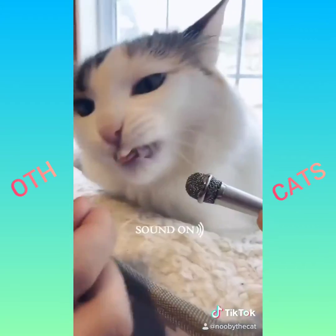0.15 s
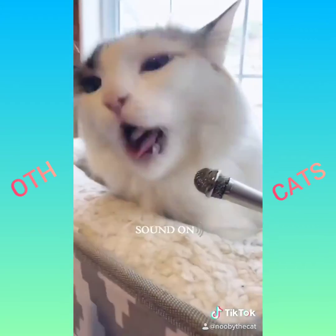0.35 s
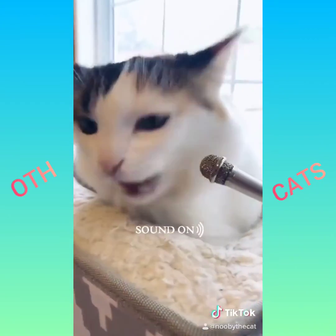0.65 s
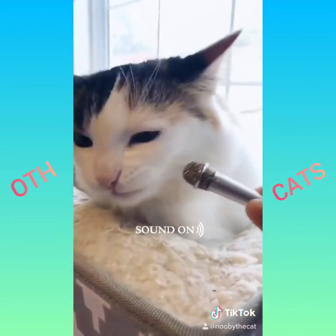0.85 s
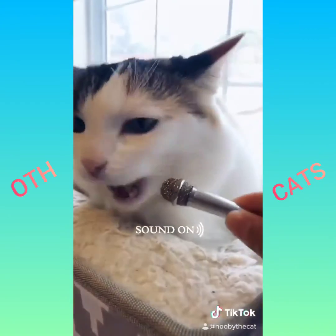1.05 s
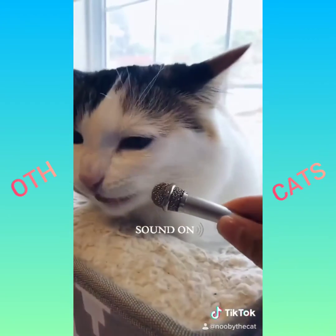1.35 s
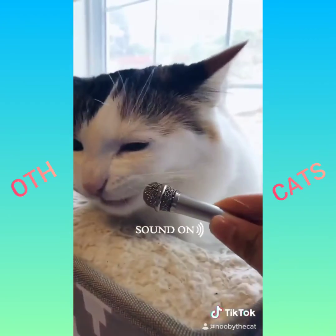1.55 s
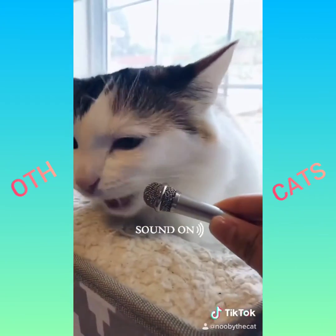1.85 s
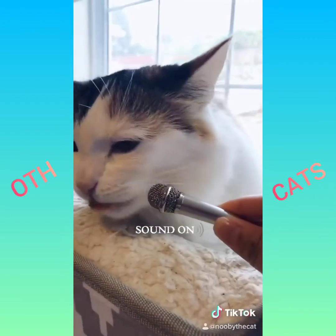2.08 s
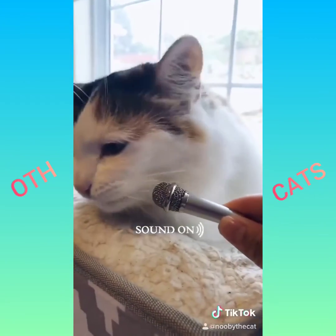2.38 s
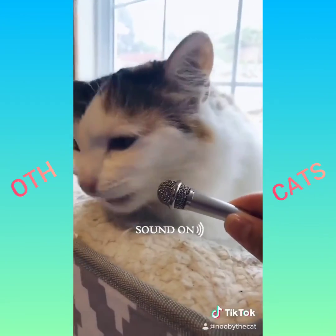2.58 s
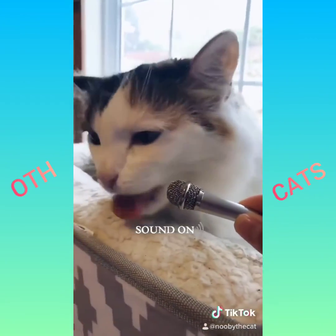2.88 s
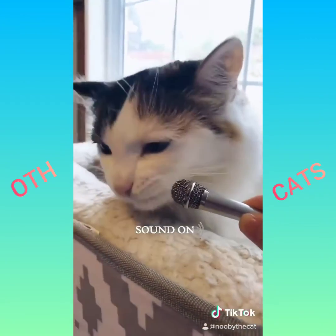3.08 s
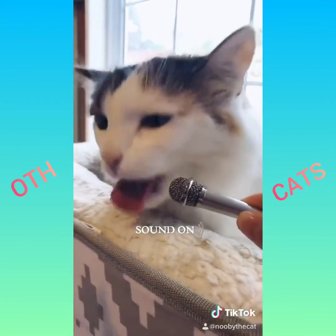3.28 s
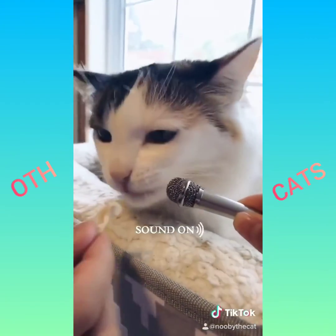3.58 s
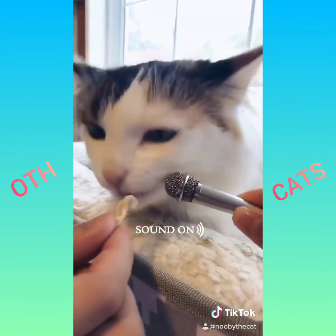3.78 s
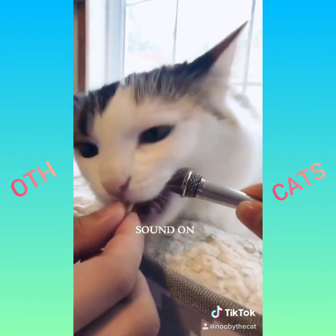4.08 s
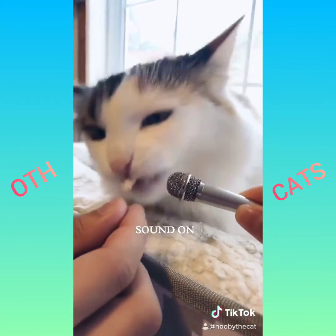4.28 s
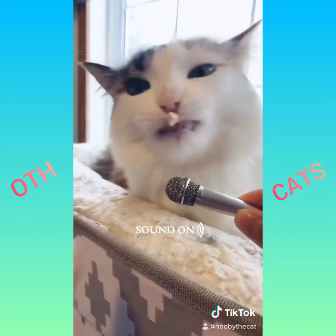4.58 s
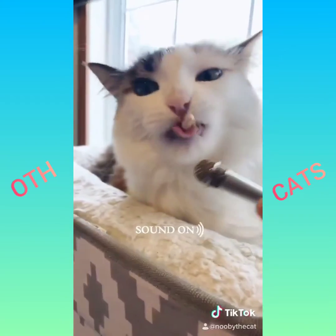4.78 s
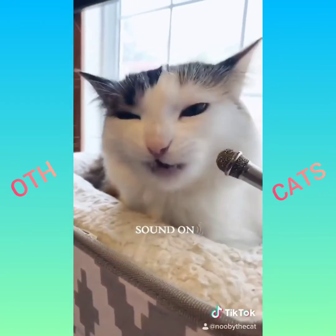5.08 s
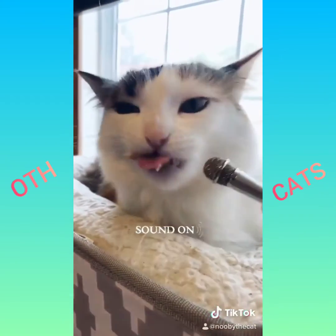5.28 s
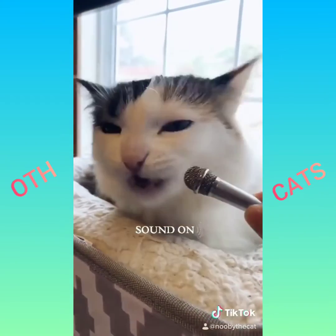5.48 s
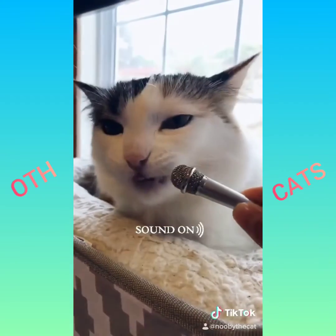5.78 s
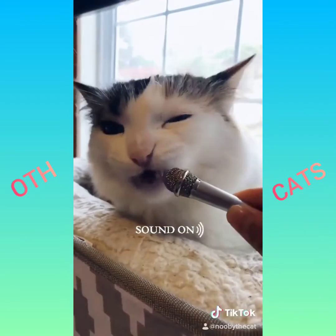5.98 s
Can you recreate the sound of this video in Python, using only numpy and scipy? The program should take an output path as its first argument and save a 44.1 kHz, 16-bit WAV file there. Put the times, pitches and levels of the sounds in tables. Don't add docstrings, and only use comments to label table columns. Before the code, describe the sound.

Extreme close-up of a cat chewing crunchy treats: brittle snaps, moist smacking and grinding, a quiet pause, then much harder bites.

```python
import sys
import numpy as np
from scipy import signal
from scipy.fft import rfft, irfft, next_fast_len
from scipy.io import wavfile
from scipy.ndimage import uniform_filter1d

SR = 44100
rng = np.random.default_rng(int(sys.argv[2]) if len(sys.argv) > 2 else 0)


def natural_amplitude(level_db):
    exponent = np.asarray(level_db, float) / 20
    return 10 ** exponent


def dump(signal):
    limited = np.clip(np.atleast_2d(signal).T, -1, 1)
    pcm = np.round(limited * 32767).astype(np.int16)
    wavfile.write(sys.argv[1], SR, pcm)


N = 270774
T = np.arange(N) / SR
GLIDE = 0.07

# start_s, length_s, crush_db, fizz_over_crush_db
CHEWS = [(.454,0.049,-58.5,-25),(.614,0.037,-55.5,-13),(.658,0.1,-58,-9.5),(1.067,0.067,-46,-9),(1.136,0.039,-46,-13),(1.172,0.018,-54.5,-13),(1.254,0.025,-54.5,-20),(1.321,0.06,-59,-0.5),(1.414,0.044,-49.5,-3.5),(1.458,0.05,-51.5,-6),(1.512,0.077,-56.5,-14),(1.632,0.063,-56.5,-14),(1.714,0.047,-49,-6),(1.818,0.087,-54.5,-7.5),(2.348,0.047,-68,-6),(3.907,0.02,-54,-11),(3.928,0.14,-58,-14),(4.083,0.065,-47.5,-8.5),(4.148,0.07,-61.5,-8),(4.516,0.02,-55.5,-11),(4.708,0.036,-64,2.5),(4.79,0.036,-55,-21),(4.849,0.026,-52,-7),(4.94,0.1,-59,-8),(5.447,0.026,-51.5,-10),(5.553,0.037,-64,-2),(5.784,0.029,-58.5,-6),(5.871,0.085,-46.5,-0.5),(5.953,0.046,-49,-7),(6.118,0.026,-51,-5)]
# start_s, length_s, crush_db
BITES = [
    (4.816,0.014,-58),
    (4.831,0.0081,-47),
    (5.062,0.014,-49),
    (5.351,0.025,-49.5),
    (5.384,0.009,-36),
    (5.393,0.016,-43),
    (5.485,0.018,-48),
    (5.535,0.0098,-44.5),
    (6.006,0.017,-51),
    (6.092,0.022,-48.5),
]
# start_s, length_s, crush_db
GRINDS = [(0.099,0.068,-63.5),(0.595,0.032,-65),(0.85,0.091,-64.5),(0.997,0.048,-67),(1.279,0.047,-65.5),(1.365,0.042,-58.5),(1.679,0.033,-61.5),(1.758,0.068,-63.5),(1.907,0.13,-65.5),(2.138,0.063,-70),(2.681,0.12,-66),(3.104,0.091,-69.5),(3.207,0.028,-60.5),(3.586,0.18,-70.5),(3.747,0.12,-64.5),(3.871,0.035,-64),(4.388,0.032,-62.5),(4.418,0.12,-74),(4.546,0.21,-71),(4.633,0.066,-61.5),(5.08,0.074,-73),(5.154,0.07,-61),(5.22,0.024,-69),(5.315,0.053,-63),(5.42,0.03,-73),(5.503,0.037,-60),(5.599,0.045,-64),(5.635,0.069,-62),(5.818,0.049,-63),(6.02,0.049,-64)]
STROKES = CHEWS + [(*row, -9) for row in BITES] + [(*row, -7) for row in GRINDS]
CRUSH_DB, FIZZ_DB = np.transpose(STROKES)[2:]


def evened(x):
    return x / np.sqrt(np.mean(x ** 2) + 1e-20)


def colour(x, points):
    size = next_fast_len(len(x))
    f, db = np.transpose(points)
    hz = np.fft.rfftfreq(size, 1 / SR)
    gain = natural_amplitude(np.interp(np.log(hz + 1), np.log(f + 1), db))
    return irfft(rfft(x, size) * gain, size)[:len(x)]


def add(mix, s, sound):
    part = mix[round(s * SR):][:len(sound)]
    part += sound[:len(part)]


def resonate(x, hz, width):
    turn = np.exp(2j * np.pi * np.cumsum(hz * np.ones(len(x))) / SR)
    r = np.exp(-np.pi * width / SR)
    smooth = signal.lfilter([1 - r], [1, -r], x / turn + 1e-18)
    return 2 * (turn * smooth).real


def surges(rows, rest_db, rise_db_s, fall_db_s):
    s, db = np.transpose(rows)[:, :, None]
    below_peak = np.maximum(rise_db_s * (s - T), fall_db_s * (T - s))
    return np.maximum((db - below_peak).max(axis=0), rest_db)


def pressure(rows, db, sag_db=0):
    gain = np.zeros(N)
    for (s, length, *_), level_db in zip(rows, db):
        add(gain, s, natural_amplitude(level_db + sag_db * np.linspace(.5, -.5, round(length * SR))))
    fade = np.exp(-1 / (0.011 * SR))
    settling = natural_amplitude(-9) * signal.lfilter([1 - fade], [1, -fade], gain)
    gain = np.maximum(gain, settling)
    return abs(uniform_filter1d(uniform_filter1d(gain, size=150), size=150))


def crumbs(per_s, spread_db, length_s, bed):
    size = natural_amplitude(np.clip(spread_db, 0, 5) * np.minimum(rng.exponential(1, N), 3))
    breaks = size * (rng.random(N) < per_s / SR)
    fade = np.exp(-1 / (length_s * SR))
    puffs = evened(signal.lfilter([1], np.convolve([1, -fade], [1, -fade]), breaks))
    return evened((puffs + bed) * rng.standard_normal(N))


def pockets(x, depth_db):
    hz, t, z = signal.stft(x, SR, nperseg=256)
    patches = rng.standard_normal((len(t), len(hz))).T
    patches = evened(uniform_filter1d(uniform_filter1d(patches, size=4, axis=0), size=9, axis=1))
    return signal.istft(z * natural_amplitude(depth_db * patches), SR, nperseg=256)[1][:N]


def room():
    # pitch_hz, level_db per Hz
    air_colour = [(47, -4.5), (80, -2.5), (129, -1.5), (185, -6), (1180, -19.5), (1600, -26.5),
                  (1710, -23.5), (9170, -40), (12700, -46), (13800, -74)]
    # pitch_hz, width_hz, level_db
    hum_lines = [(122.6, 8, -58.5)]
    air = natural_amplitude(-57) * evened(colour(rng.standard_normal(N), air_colour))
    whine = natural_amplitude(-74) * np.sqrt(2) * np.sin(2 * np.pi * 1577 * T)
    hum = sum(natural_amplitude(db) * evened(resonate(rng.standard_normal(N), hz, w)) for hz, w, db in hum_lines)
    return air + whine + hum


def shaking():
    # peak_s, peak_db
    lurches = [(.32,-26.5),(.79,-34),(1.45,-33),(1.78,-34),(2.18,-32),(2.73,-35),(2.89,-34),(3.26,-35),(3.71,-32.5),(4.02,-24),(4.09,-35.5),(4.83,-20.5),(5.35,-22),(5.46,-40),(5.55,-32.5),(5.88,-22),(6.1,-30.5)]
    # pitch_hz, level_db per Hz
    sway_colour = [(3, -5.5), (7, 18.5), (21, 5.5), (60, -4), (100, -18), (200, -66)]
    level_db = surges(lurches, rest_db=-40.5, rise_db_s=252, fall_db_s=106)
    return natural_amplitude(level_db) * evened(colour(rng.standard_normal(N), sway_colour))


def bumps():
    # start_s, peak_db, pitch_hz
    blows = [(0.548, -27.5, 37), (0.754, -33.5, 126), (1.073, -23, 140), (1.153, -29, 177),
             (4.028, -22.5, 163), (4.792, -13, 11.1), (5.335, -17, 13.3), (5.4069, -21, 320),
             (5.5348, -11, 362), (5.9208, -14.5, 320), (5.949, -14, 195), (6.1, -22, 660)]
    out, t = np.zeros(N), np.arange(9000) / SR
    for s, db, hz in blows:
        shape = np.exp(-t * hz / 0.7) * np.minimum(t * hz / .12, 1)
        add(out, s, natural_amplitude(db - 0.5) * np.sin(2 * np.pi * hz * t) * shape)
    return out


def rustle():
    clumps = natural_amplitude(7.0 * evened(uniform_filter1d(rng.standard_normal(N), size=1500)))
    grit = pockets(crumbs(per_s=160, spread_db=2.5, length_s=0.0008, bed=0.5), depth_db=4.0)
    crackle = colour(grit, [(900, 2), (2500, 13.0), (8000, -17.0), (13000, -23)])
    return natural_amplitude(-76.0) * evened(clumps * crackle)


def splinters():
    # peak_s, level_db, pitch_hz
    puffs = [(0.638,-54,10600),(.677,-53,3700),(1.058,-45,5070),(1.069,-49,7200),(1.086,-45,8300),(1.087,-44,11500),(1.099,-50,10100),(1.11,-51,4400),(1.124,-42,8200),(1.138,-58,8300),(1.147,-51,5600),(1.356,-56,5500),(1.42,-43,4500),(1.427,-41.5,12100),(1.428,-44,6360),(1.454,-48,7100),(1.482,-51,9300),(1.49,-53,3900),(1.491,-52,6900),(1.501,-49,7060),(1.568,-51.5,6700),(1.645,-51,3400),(1.655,-55,4800),(1.736,-44,7540),(1.742,-50,3200),(1.861,-48.5,3700),(1.916,-54,3700),(2.735,-55,2700),(3.237,-56,3400),(3.248,-60,8950),(3.494,-53,8500),(3.878,-48,7300),(4.084,-49,9900),(4.095,-48,10100),(4.113,-49,4600),(4.2,-48.5,7550),(4.199,-49,4130),(4.645,-42.5,11400),(4.82,-47,5300),(4.836,-42,8700),(4.839,-42,5040),(4.864,-36,9500),(4.888,-59,10700),(5.183,-53,7760),(5.363,-33.5,2460),(5.372,-47,10800),(5.378,-48,2300),(5.399,-53,11000),(5.462,-51,6600),(5.498,-44,6400),(5.787,-54,8000),(5.884,-35,5000),(5.897,-38,7300),(5.919,-40,7000),(5.921,-33.5,4870),(5.947,-38,7600),(5.963,-43,3900),(5.987,-46,10800),(6.095,-41.5,7300),(6.137,-44,7200)]
    out, t = np.zeros(N), np.arange(-150, 350) / SR
    shape = np.exp(np.where(t < 0, -(t / 0.0018) ** 2, -t / 0.00084))
    for (s, db, hz), draw in zip(puffs, rng.standard_normal((len(puffs), 500))):
        wide = 0.2 * hz
        puff = resonate(resonate(shape * draw, hz, wide), hz, wide)
        add(out, s + t[0], natural_amplitude(db - 6) * evened(puff))
    return out


def scrapes():
    # start_s, length_s, level_db, pitch_hz
    drags = [(0.209,.025,-51,1700),(0.617,0.01,-57,5000),(0.678,0.021,-58.5,5000),(.688,.02,-61,3600),(1.053,0.011,-55,2500),(1.073,0.05,-48.5,4270),(1.078,0.017,-43.5,1560),(1.149,.035,-53,3400),(1.408,0.042,-49,6550),(1.427,0.026,-54,4100),(1.511,0.078,-56,3600),(1.53,0.049,-57,2510),(1.824,0.04,-64,5000),(1.84,0.13,-64,3570),(1.895,0.016,-52,1290),(2.018,0.018,-59,1620),(2.16,0.056,-62,2300),(2.565,0.028,-53,1460),(3.348,0.042,-60,1510),(4.3,0.093,-64.5,2580),(4.397,0.023,-54,2260),(4.481,.03,-60,2380),(4.703,.03,-59,4130),(4.883,.04,-60,4600),(4.924,0.013,-49,2000),(5.352,0.015,-55,2400),(5.405,.007,-49,11800),(5.666,0.05,-60.5,2930),(5.825,0.048,-54,2150),(6.127,.012,-50,2800),(4.26,.28,-70,2700),(0.118,0.068,-61,1500),(4.837,0.0035,-41,2600),(5.88,0.013,-43,5600),(5.914,.007,-44,7200),(5.951,0.003,-41,9000),(3.754,0.047,-63,1800),(2.979,.015,-62,1780),(3.127,.012,-62,2800),(0.282,.008,-63,5500),(.286,0.0067,-51,11000),(2.121,0.0083,-55.5,12200),(1.423,0.043,-50,1470),(1.513,0.066,-49,1300),(1.832,0.067,-54,1400),(2.19,.025,-59,1510),(0.223,0.029,-57,1260),(4.398,0.066,-64,2880)]
    out = np.zeros(N)
    for (s, length, db, hz), draw in zip(drags, rng.standard_normal((len(drags), 6000))):
        stroke = draw[:round(length * SR)]
        wide = 0.14 * hz
        sinking_hz = hz * np.linspace(1 + GLIDE, 1 - GLIDE, len(stroke))
        scrape = evened(resonate(resonate(stroke, sinking_hz, wide), sinking_hz, wide))
        add(out, s, natural_amplitude(db) * np.sqrt(np.hanning(len(stroke))) * scrape)
    return out


def cracks():
    # peak_s, peak_db, ring_hz, crisp_edge_db
    dry_cracks = [(.29,-42,6250,-33.5),(1.069,-29,2490,-30),(1.1218,-18.5,5800,-20),(1.4192,-22.5,1720,-25),(1.7427,-24,7060,-49),(2.1253,-56,1490,-39.5),(3.4942,-21.5,2220,-49),(3.7194,-24.5,1890,-33.5),(3.878,-22.5,2570,-27),(4.0829,-22.5,2150,-34),(4.094,-27,6600,-39),(4.1987,-29.5,1150,-31),(4.6426,-57,8700,-28),(4.8325,-21,7200,-42),(4.8365,-21,2590,-20),(4.864,-21.5,1560,-24),(5.0667,-28.5,2030,-48),(5.3635,-12.5,7560,-42),(5.3878,-13,2440,-11.5),(5.4001,-6,4380,-23),(5.4963,-27.5,3770,-21.5),(5.5354,-21.5,2460,-20),(5.5398,-19.5,4500,-10.5),(5.5477,-21.5,4430,-24),(5.883,-14.5,7200,-24),(5.8971,-26,7100,-37),(5.9049,-30,7040,-39),(5.9213,-16.5,3000,-15),(5.9497,-16,1800,-7.5),(5.9917,-40,1230,-33)]
    # peak_s, peak_db, ring_hz, crisp_edge_db
    faint_cracks = [
        (.05, -49, 2600, -56),
        (0.508, -42, 1350, -56),
        (.549, -40, 1940, -47),
        (2.303, -41, 1690, -72),
        (2.3416, -40, 1350, -47),
        (2.6461, -44, 2540, -72),
        (2.893, -45, 5940, -44),
    ]
    # peak_s, peak_db, ring_hz
    clicks = [(.617,-23.5,2410),(1.058,-26,2220),(1.136,-24,3320),(1.168,-25,1730),(1.5094,-26,1320),(1.6826,-32.5,1740),(2.6911,-28.5,2780),(2.966,-35,950),(3.1513,-31.5,2280),(3.178,-36.5,1900),(3.212,-30,1980),(3.3552,-27.5,1340),(3.5074,-31,2200),(3.553,-33.5,2050),(3.6055,-26.5,1770),(3.6156,-29.5,1550),(3.6307,-32.5,1840),(3.667,-37,3860),(3.8938,-16,2670),(3.9096,-30,3440),(3.9171,-31,1230),(4.109,-32,2240),(4.7966,-31,2170),(4.8168,-24.5,2500),(4.8507,-24,2050),(5.214,-30,2880),(5.357,-22,2360),(5.3917,-17.5,1950),(5.8142,-29.5,1960),(6.0995,-35,1210)]
    # peak_s, peak_db, ring_hz
    chips = [(.6427,-32,4000),(0.6748,-35,1760),(1.141,-30,1580),(1.33,-37.5,3660),(1.3567,-40,1400),(1.3704,-28,6000),(1.3,-34,2000),(1.455,-30,1400),(3.2,-37,1800),(3.2372,-39,3500),(2.9,-42.5,2000),(3.597,-39,1600),(3.6,-37,2200),(3.6,-32.5,1740),(5.371,-24,4500),(5.4085,-24,1910),(5.4917,-27,7600),(5.5219,-31,4200),(5.5697,-30,3780),(5.655,-33.5,3240),(5.4,-36,2200),(5.872,-24.5,1770),(5.9856,-36,3370),(6.0122,-26,4100),(6.093,-22,5500),(4.005,-38,1500),(1.058,-30,5000),(5.751,-44,2500),(6.0495,-47,3200),(6.0615,-48,3300),(5.799,-40,5000),(1.31,-40,6500),(3.138,-47,4500),(3.1,-50,7800),(5.438,-36,1700),(5.468,-37,2300),(2.6,-46,6700),(6.0998,-22.5,2800),(3.3553,-44,4200),(3.2,-44,2100),(6.108,-36,6500),(5.514,-37,8000),(5.905,-28,5500),(5.929,-25,8000),(1.0575,-28,3200),(1.128,-30,2800),(3.608,-36.5,3600),(5.378,-38,2200),(5.3925,-24,5000),(1.1465,-34,5900),(1.111,-35,5600),(1.49,-38,2200),(3.925,-40,4000),(3.846,-48,9000),(6.022,-42,3000),(4.8,-40,4600),(5.35,-40,2500),(1.322,-36,3800),(5.4003,-22,1100),(4.88,-38,5500)]
    rows = dry_cracks + faint_cracks + [(s, db, hz, db - 22) for s, db, hz in clicks]
    rows += [(s, db, hz, db - 6.5) for s, db, hz in chips]
    out, t = np.zeros(N), np.arange(-60, 340) / SR
    spit_shape = np.exp(np.where(t < 0, t / 0.000055, -t / 0.001))
    for (s, db, hz, edge_db), draw in zip(rows, rng.standard_normal((len(rows), 402))):
        fall_s = .0002 + 1.15 / hz
        ring_shape = np.exp(np.where(t < 0, -(t / (.15 * fall_s)) ** 2, -t / fall_s))
        ring = np.cos(2 * np.pi * hz * t + draw[0]) * ring_shape
        spit = np.convolve(np.diff(draw[1:]), [.25, .8, .25], "same") * spit_shape
        add(out, s + t[0], natural_amplitude(db - 4.0) * ring + natural_amplitude(edge_db - 9.0) * spit)
    return out


def jaw_knock():
    # peak_s, peak_db
    knocks = [(.75,-44),(.96,-45.5),(1.08,-43.5),(1.155,-43),(1.37,-46),(1.45,-39),(1.75,-46.5),(1.87,-48.5),(2.46,-48),(3.36,-46.5),(3.78,-46),(3.915,-44),(4.03,-61),(4.09,-50),(4.88,-44),(5.21,-48.5),(5.4,-47),(5.465,-41.5),(5.54,-41),(5.93,-34),(6.1,-50)]
    # pitch_hz, level_db per Hz
    bone_colour = [(60, 8.5), (140, 6.5), (350, 0), (800, -8.5), (1800, -31)]
    grit = crumbs(per_s=220, spread_db=3.0, length_s=0.002, bed=0.5)
    knock_db = surges(knocks, rest_db=-56, rise_db_s=233, fall_db_s=227)
    jaw = natural_amplitude(knock_db - 1.0) + pressure(STROKES, CRUSH_DB + 0.5)
    return jaw * evened(colour(grit, bone_colour))


def mouth_ring():
    # start_s, length_s, ring_db, mouth_pitch_hz
    first_smacks = [(0.119,0.047,-62,1940),(0.17,0.095,-60,1340),(0.27,0.066,-69,1750),(0.452,0.062,-68,1390),(0.617,0.027,-59,1640),(0.671,0.13,-68,1540),(0.844,0.14,-73,1420),(0.967,0.043,-61,1550),(1.056,0.055,-52,2260),(1.132,0.043,-56.5,3400),(1.261,0.02,-61,990),(1.411,0.047,-49,1550),(1.47,0.03,-56,1400),(1.502,0.073,-52,1250),(1.632,0.035,-68,1738),(1.717,0.037,-63,2180),(1.821,0.11,-56,1270),(1.932,0.14,-64.5,1330),(2.156,0.062,-61,1560),(2.343,0.052,-65.5,1540),(2.553,0.07,-62,1220),(2.693,0.045,-66.5,2660),(3.105,0.15,-74,1810)]
    # start_s, length_s, ring_db, mouth_pitch_hz
    later_smacks = [(3.758,0.039,-59,1200),(3.35,0.04,-66,2600),(3.874,0.21,-67.5,1050),(4.086,0.064,-53,2170),(4.252,0.15,-65.5,2270),(4.381,0.17,-65,2360),(4.785,0.044,-64,2180),(4.85,0.038,-51.5,1930),(4.886,0.035,-50.5,1830),(4.923,0.019,-59,2050),(4.976,0.1,-65.5,1960),(5.145,0.061,-72,2540),(5.314,0.023,-57,1980),(5.346,0.039,-65,2230),(5.395,0.045,-58.5,1900),(5.45,0.053,-70,2650),(5.534,0.054,-66,2770),(5.617,0.12,-71,2900),(5.792,.08,-57.5,2080),(5.874,0.024,-46,1880),(5.967,.037,-74,1150),(6.097,0.022,-64,2610)]
    # multiple_of_mouth_pitch, width_hz, level_db
    modes = [(1.0, 330, 0), (1.0, 1500, -17), (1.3, 750, -10), (1.9, 700, -15), (2.7, 700, -17)]
    smacks = first_smacks + later_smacks
    s, length, ring_db, hz = np.transpose(smacks)
    ends = np.ravel([s, s + length - .004], "F")
    sinking_hz = np.outer(hz, [1 + GLIDE, 1 - GLIDE]).ravel()
    mouth_hz = np.interp(T, np.maximum.accumulate(ends), sinking_hz)
    mouth_hz = uniform_filter1d(mouth_hz, size=300)
    drive = crumbs(per_s=240, spread_db=0, length_s=.0012, bed=3)
    ring = np.zeros(N)
    for k, w, db in modes:
        ring += natural_amplitude(db) * resonate(resonate(drive, k * mouth_hz, w), k * mouth_hz, 1.6 * w)
    wet = uniform_filter1d(pressure(smacks, ring_db + 3.5), size=300)
    return wet * evened(ring)


def crunch():
    # pitch_hz, level_db per Hz
    crush_colour = [(1500, 9.5), (3200, 7.5), (4500, 6), (7000, 3.5), (9000, -20.5)]
    # pitch_hz, level_db per Hz
    fizz_colour = [(5500, -22), (7800, 9), (10500, 7.5), (12800, 3.5), (14000, -23)]
    grit = pockets(crumbs(per_s=600, spread_db=3.2, length_s=.0005, bed=1.0), depth_db=3.0)
    crush = pressure(STROKES, CRUSH_DB - .8, sag_db=2.5) * evened(colour(grit, crush_colour))
    fizz_press = pressure(STROKES, CRUSH_DB + FIZZ_DB - 1.0, sag_db=3.5)
    return crush + fizz_press * evened(colour(grit, fizz_colour))


def scene():
    background = room() + shaking() + bumps() + rustle()
    details = splinters() + scrapes() + cracks()
    chewing = jaw_knock() + mouth_ring() + crunch()
    mono = background + details + chewing
    return np.array([mono, mono])


def band_limit(x):
    return signal.sosfilt(signal.butter(12, 13960, fs=SR, output="sos"), x)


def record(dry):
    # pitch_hz, level_db
    spread = [(60, -62), (250, -54.5), (700, -44.5), (1500, -41.5), (3500, -46), (4300, -16), (8500, -6.5),
              (13400, -12)]
    hz, t, z = signal.stft(dry[0], SR, nperseg=256)
    turn = np.exp(2j * np.pi * rng.random(z.T.shape).T)
    scrambled = signal.istft(z * turn, SR, nperseg=256)[1][:N]
    side = colour(evened(scrambled) * dry[0].std(), spread)
    edge = signal.firwin(201, 13250, window=("kaiser", 5), fs=SR)
    wide = signal.oaconvolve(dry + np.array([side, -side]), edge[None], "same")
    mix = wide + natural_amplitude(-34) * dry
    return band_limit(mix)


dry = scene()
out = record(dry)
dump(out)
```